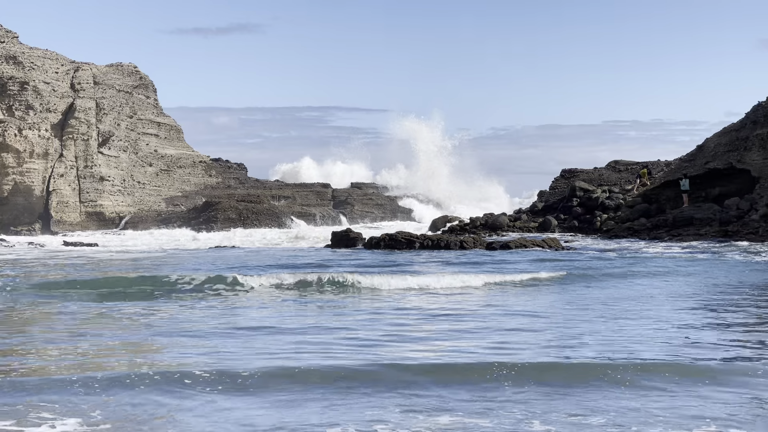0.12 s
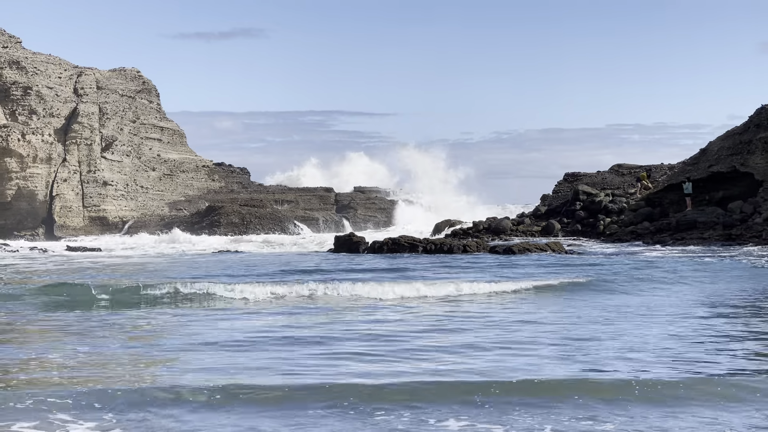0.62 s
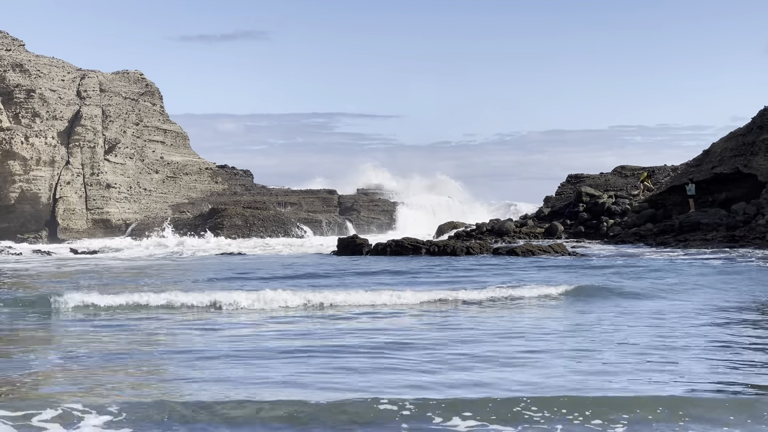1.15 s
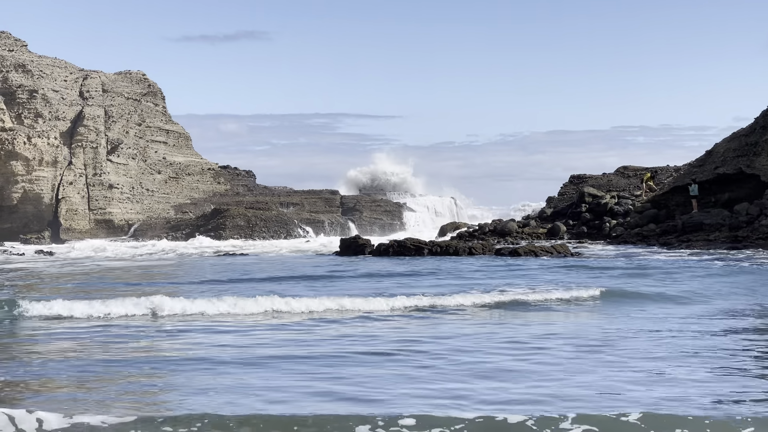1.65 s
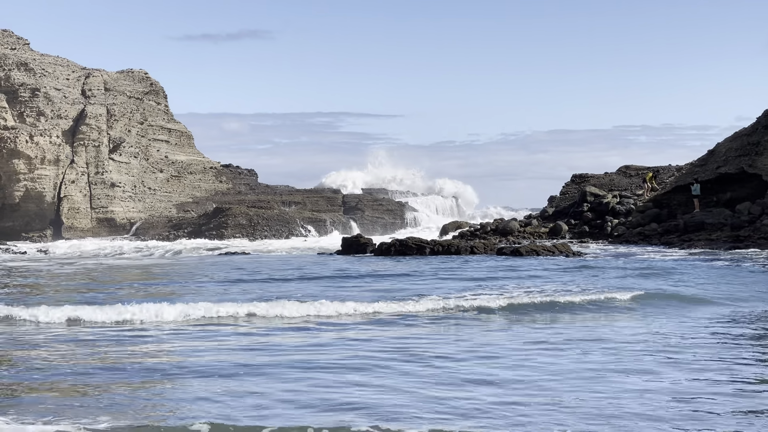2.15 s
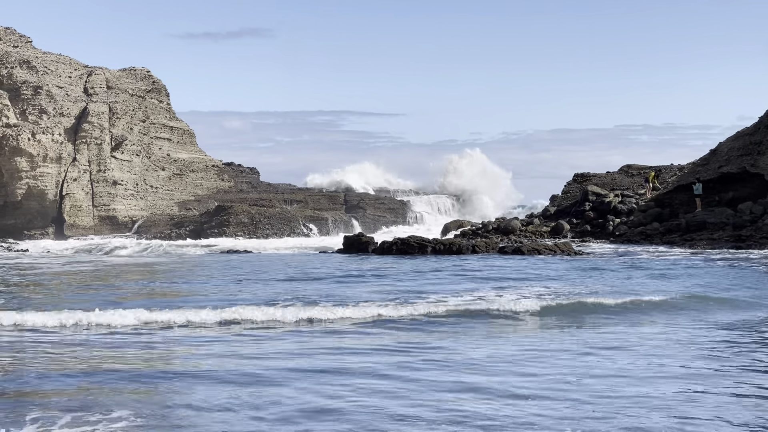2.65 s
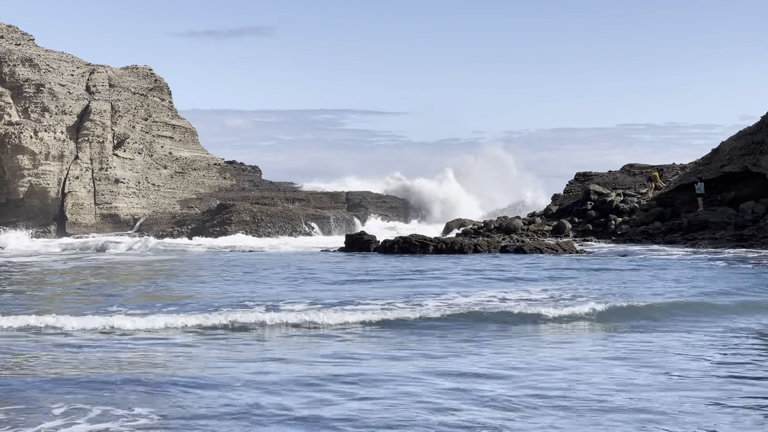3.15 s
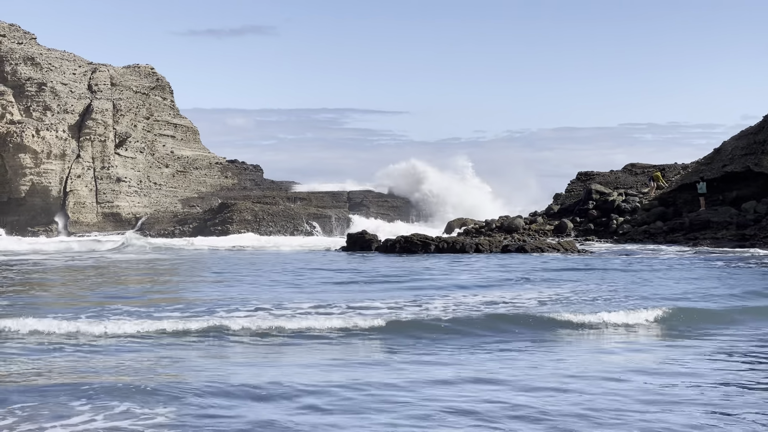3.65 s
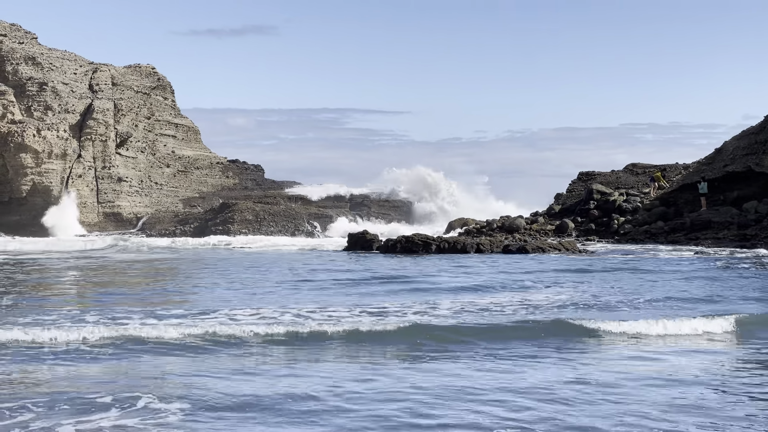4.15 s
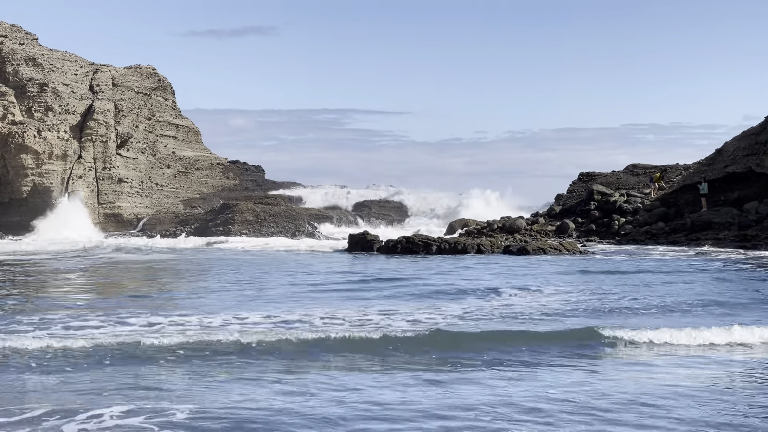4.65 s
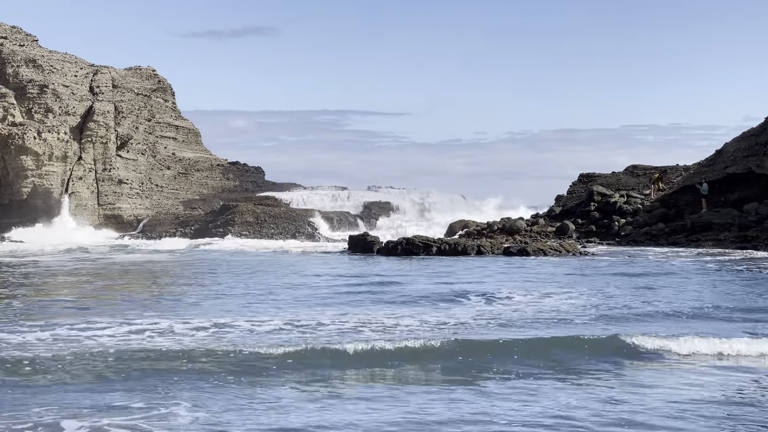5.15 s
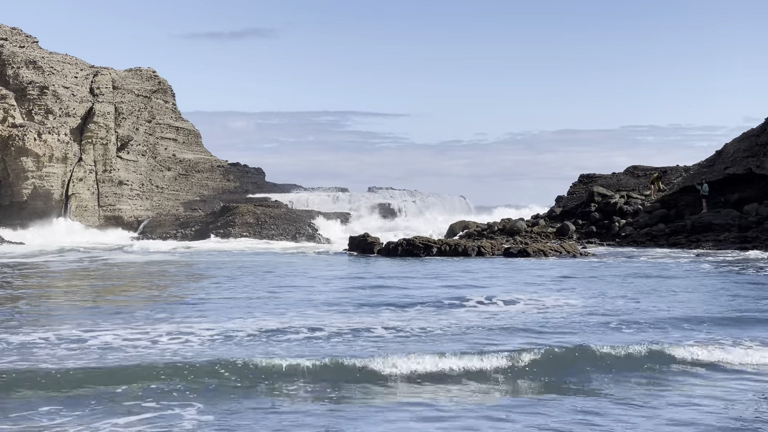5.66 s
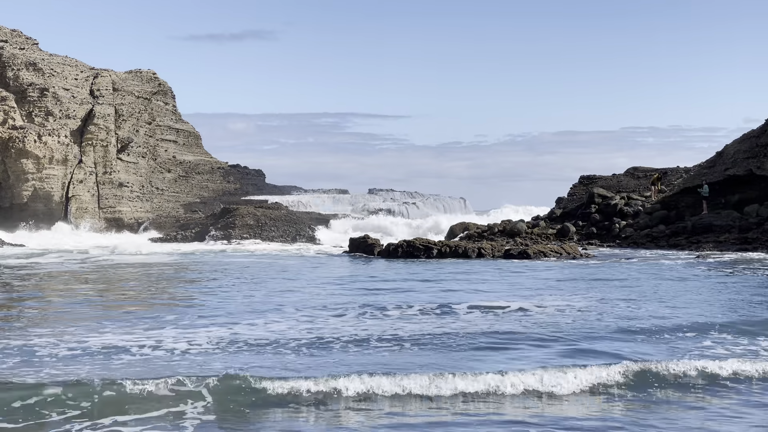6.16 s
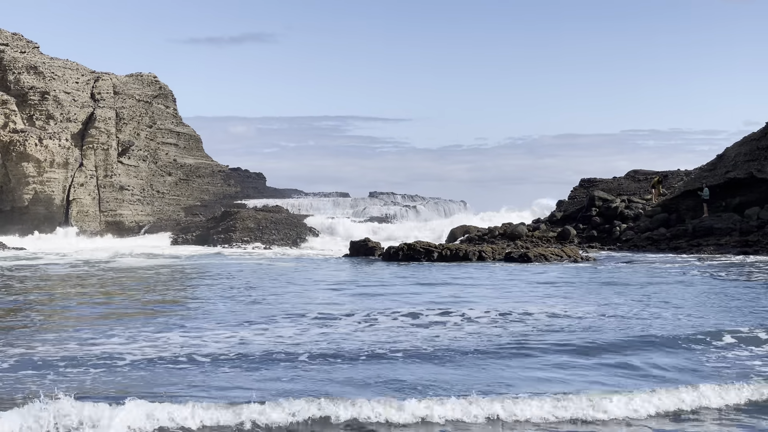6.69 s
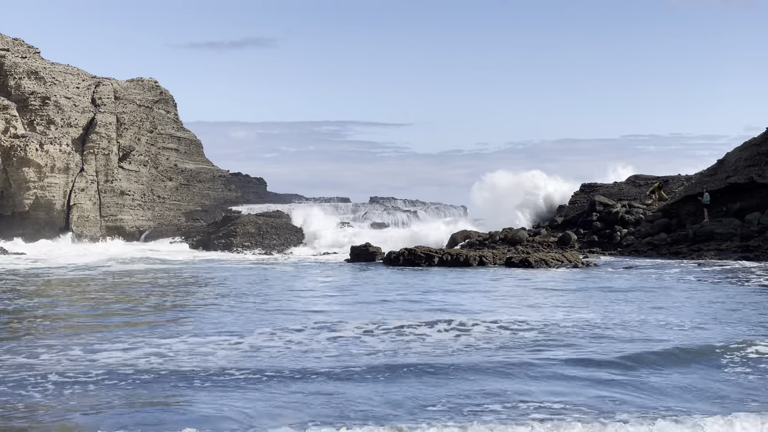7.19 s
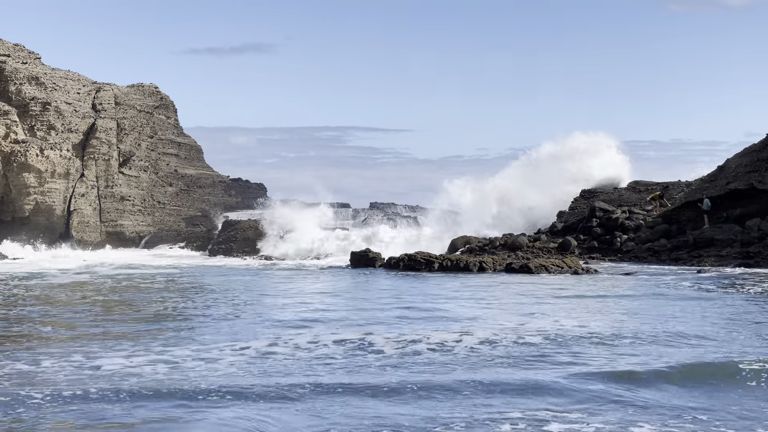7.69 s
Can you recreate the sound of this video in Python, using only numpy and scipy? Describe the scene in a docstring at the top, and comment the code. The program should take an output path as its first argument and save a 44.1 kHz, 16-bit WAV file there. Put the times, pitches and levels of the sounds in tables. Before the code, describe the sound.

Surf in an open rocky cove, heard in stereo from the shore, continuous from start to finish. Distant breakers give a dull, broad roar with gurgling bubbles and an uneven low boom; a breeze presses on the microphone as soft deep buffeting. At first the near foam is only a quiet wash and fizz, lifting slightly around 1 s. From about 1.8 to 3.2 s small wavelets fold, with tiny sharp spray spits, a few hollow rising plops near 2 to 2.5 s and fuller hiss by 3 s. Soft low thumps come at 2.5, 3.4, 4 and 4.3 s, with a gust near 3.4 s. The surf then runs steadier. Spray returns at 5.5 to 5.8 s, building to the loudest rush and bright fizz near 6.6 s, with a tumbling cluster of plops until 7 s. Low thumps follow at 7 to 7.2 s amid swelling boom; foam keeps hissing to the end at 7.8 s.

```python
"""Surf in a rocky cove, in a breeze. Throughout, far breakers boom in lumps and roar as merged bubble noise,
near foam fizzes as its bubbles burst, and wind presses on a microphone pair as deep filtered noise.
Wavelets fold at about 1, 2 and 3 s: spray jumps in level, closing air pockets plop as short rising tones,
and low thumps follow until 4.3 s. From 5.5 s the spray returns; the roar and foam peak near 6.6 s
in a cluster of plops, then low thumps sound near 7 s while the boom swells."""
import sys
import numpy as np
from scipy import signal
from scipy.fft import rfft, irfft, next_fast_len
from scipy.io import wavfile
from scipy.ndimage import uniform_filter1d, map_coordinates

SR = 44100
rng = np.random.default_rng(int(sys.argv[2]) if len(sys.argv) > 2 else 0)


def store_pcm(level_fs):
    """Save levels as 16-bit WAV."""
    pcm = np.round(np.clip(level_fs, -1, 1) * 32767).astype(np.int16)
    wavfile.write(sys.argv[1], SR, np.atleast_2d(pcm).T)


def gain_from_decibels(decibels):
    """Convert decibel values to linear amplitude factors."""
    exponent = np.asarray(decibels, float) / 20
    return 10 ** exponent


N = 344421  # samples, 7.81 s


def unit(x):
    """Normalization: scale to an rms of 1 over all rows."""
    return x / np.sqrt(np.mean(x ** 2) + 1e-20)


def along(points, hz):
    """Piecewise-linear interpolation of (f/Hz, value) points on a logarithmic frequency axis."""
    f, value = np.transpose(points)
    return np.interp(np.log(hz + 1), np.log(f + 1), value)


def curve(points):
    """Piecewise-linear envelope: (t/s, value) points interpolated at every sample."""
    t, value = np.transpose(points)
    return np.interp(np.arange(N) / SR, t, value)


def wobble(rate):
    """Slow random modulation: a smooth curve through rate random knots a second."""
    knots = rng.standard_normal(int(N * rate / SR) + 4)
    return map_coordinates(knots, [np.arange(N) * rate / SR])


def filtered(x, response):
    """Linear filtering: the spectrum of x times a complex response of frequency."""
    size = next_fast_len(N + 8192)
    hz = np.fft.rfftfreq(size, 1 / SR)
    return irfft(rfft(x, size) * response(hz), size)[..., :N]


def patchy(depth_db):
    """Non-stationary noise: two white noises share random level patches in time and frequency."""
    cells = signal.stft(rng.standard_normal((2, N)), nperseg=512)[2]
    field = rng.standard_normal(cells.shape[1:])
    field = uniform_filter1d(field, size=8, axis=0)  # over frequency
    field = uniform_filter1d(field, size=12, axis=1)  # over time
    return signal.istft(cells * gain_from_decibels(depth_db * unit(field)), nperseg=512)[1][:, :N]


def crackle(count, spread_db):
    """Shot noise: two streams of bubble impulses at random instants, a few much larger than most."""
    streams = []
    for draw in rng.random((2, count, 3)):
        instant = (draw[:, 0] * N).astype(int)
        size = gain_from_decibels(-spread_db * np.log(1 - .997 * draw[:, 1]))
        sign = np.sign(draw[:, 2] - .5)
        streams.append(np.bincount(instant, size * sign, N))
    return unit(np.array(streams))


def coloured(pair, spectrum):
    """Spectral shaping: a noise pair filtered to a spectrum, at rms sqrt(2), which scene() divides out."""
    return unit(filtered(pair, lambda hz: gain_from_decibels(along(spectrum, hz)))) * np.sqrt(2)


def bursts(table, rise):
    """Oscillation of trapped air: a soft start and a few cycles, the pitch rising by the fraction
    rise either side of its mean."""
    out = np.zeros(N + SR)
    for s, db, hz, cycles in table:
        length = SR * cycles / hz
        u = np.arange(int(length)) / length
        swing = np.sin(2 * np.pi * cycles * (u + rise * (u * u - u)))
        envelope = np.sin(np.pi * u ** 0.67) ** 2
        out[round(s * SR):][:len(u)] += gain_from_decibels(db) * envelope * swing
    return out[:N]


def wind():
    """Pressure fluctuation: gusts press on the microphones far down in the bass."""
    # deep buffeting: t/s, level/dB
    gusts = [(0, -32), (.17, -43), (.37, -34), (.55, -47), (.9, -35.5), (1.5, -39), (1.78, -50),
             (2.25, -35.5), (3.3, -36.5), (3.45, -27), (3.85, -39), (4.0, -37), (4.55, -39.5), (5.3, -35),
             (5.5, -42), (7.0, -36), (7.24, -34), (7.4, -39), (7.75, -29)]
    # spectrum of the buffeting: f/Hz, relative spectral level/dB
    buffet = [(20, -30), (32, 3), (45, 4.5), (62, 12.5), (85, 5.5), (130, -35)]
    return gain_from_decibels(curve(gusts) + 0.36 * wobble(4.9)) * coloured(patchy(depth_db=0.5), buffet)


def rumble():
    """Amplitude modulation of low noise: the boom of far breakers arrives in lumps."""
    # the boom swells and sinks: t/s, level/dB
    boom = [(0, -31.5), (2.3, -33.5), (2.55, -31), (3.15, -31.5), (3.45, -29.5), (3.7, -33), (4.0, -28.5),
            (4.5, -30), (5.3, -27), (5.6, -28.5), (5.75, -32.5), (5.95, -29.5), (6.5, -31.5), (7.1, -27),
            (7.4, -29.5), (7.81, -28.5)]
    # spectrum of the boom: f/Hz, relative spectral level/dB
    spectrum = [(35, -36), (60, -0.5), (90, 1), (125, 1), (250, -7.5), (400, -14.5), (700, -30),
                (1200, -61)]
    lumps = gain_from_decibels(0.6 * wobble(7.9) + 0.82 * wobble(25))
    return gain_from_decibels(curve(boom)) * lumps * coloured(patchy(depth_db=0.65), spectrum)


def gurgle(count, centre_hz):
    """Bubble resonance: large bubbles ring at random moments, pitches and levels in tumbling water."""
    draw = rng.random((count, 3))
    octaves = 1.128 * (draw[:, 1] + draw[:, 2] - 1) * 2  # triangular spread about the centre
    db = rng.normal(0, 2.4, count)
    cycles = np.full(count, 6.5)
    table = np.transpose([draw[:, 0] * N / SR, db, centre_hz * 2 ** octaves, cycles])
    return unit(bursts(table, rise=0.22))


def roar():
    """Incoherent superposition: countless far bubbles merge into a rush; larger ones gurgle through."""
    # how much the far surf tumbles: t/s, level/dB
    surf = [(0, -35.5), (.7, -36), (.9, -32.5), (1.1, -34.5), (1.26, -33.5), (1.6, -35.5), (2.15, -34),
            (2.45, -33.5), (2.75, -32.5), (3.05, -30.5), (3.3, -30), (3.7, -32), (4.5, -33), (5.0, -33),
            (6.2, -32.5), (6.5, -30.5), (6.66, -28.5), (7.05, -30), (7.45, -33), (7.81, -33.5)]
    # spectrum of the rush: f/Hz, relative spectral level/dB
    spectrum = [(120, -6.5), (250, 1), (450, -2.5), (750, -0.5), (900, -4.5), (1300, -8), (2000, -18),
                (3500, -37)]
    rush = coloured(patchy(depth_db=0.9), spectrum)
    rush[0] += .35 * gurgle(count=900, centre_hz=523)
    return gain_from_decibels(curve(surf) + 0.31 * wobble(8.6)) * rush


def thumps():
    """Low-frequency transients: thumps of water or wind, a few cycles of slightly rising pitch."""
    # t/s, level/dB (peak), f/Hz, length/cycles
    knocks = [(2.469, -21, 98, 2.4), (2.648, -16.5, 85, 1.2), (3.406, -18, 144, 4.1), (3.47, -14, 86, 2.4),
              (3.949, -14.5, 75, 4), (4.288, -18, 113, 2.1), (6.678, -22.5, 95, 1.5), (7.05, -18, 90, 1.06),
              (7.08, -21, 90, 1.5), (7.219, -18.5, 60, 3.3)]
    return bursts(knocks, rise=0.065)


def plops():
    """Cavity resonance: air pockets close as a wavelet folds, the pitch rising as each shrinks."""
    # t/s, level/dB (peak), f/Hz, length/cycles
    pockets = [(2.027, -28, 770, 12), (2.334, -26.5, 710, 13), (2.485, -19.5, 746, 6.6),
               (3.352, -29, 730, 5.1), (4.075, -24, 615, 7.1), (6.605, -22, 600, 5.6),
               (6.635, -14.5, 750, 7.5), (6.657, -20, 660, 6), (6.74, -21, 380, 4.7),
               (6.743, -19, 193, 3.2), (6.803, -22.5, 318, 6.4), (6.821, -18.5, 580, 4.5),
               (6.872, -22, 296, 5.5), (6.991, -20, 264, 5.3)]
    return bursts(pockets, rise=0.14)


def spits():
    """Exponential decay: spray landing close by lifts the level (dB), which falls back within moments."""
    # t/s, jump/dB (before the onset ramp and each foam layer's weight), decay time/s
    spray = [(1.04, 1, 0.027), (1.856, 8, .005), (2.035, 11, 0.0064), (2.467, 5, .02), (2.777, 7, .012),
             (2.852, 9.5, .012), (2.958, 9, 0.01), (2.990, 5, .012), (3.16, 5, .025), (5.49, 2, .02),
             (5.739, 4, .015), (5.773, 5, .015), (6.160, 1, .01), (6.441, 5, .01), (6.509, 4.5, .02),
             (6.538, 8, .02), (6.588, 9.5, 0.011), (6.628, 8, 0.019)]
    out = np.zeros(N + SR)
    t = np.arange(SR // 4) / SR
    for s, db, tau in spray:
        onset = np.minimum(t / 0.0017, 1)
        out[round(s * SR):][:len(t)] += db * onset * np.exp(-t / tau)
    return out[:N]


def freshness():
    """Bubble ageing: the finest bubbles' lift (dB) grows as a wavelet folds and fades as foam coarsens."""
    # wavelets folding over: t/s, lift/dB of the sizzle (before growth and fading)
    folds = [(1.0, 2), (1.8, 2), (2.75, 3.5), (5.7, 1.5), (6.45, 1.5), (6.95, 2.5)]
    rise_s, coarsen_s = .1, 0.66
    start, lift_db = np.transpose(folds)[..., None]
    age = np.maximum(np.arange(N) / SR - start, 0)
    growth = 1 - np.exp(-age / rise_s)
    return np.sum(lift_db * growth * np.exp(-age / coarsen_s), axis=0)


def fizz():
    """Shot noise over filtered noise: near foam as wash, hiss and fine sizzle, in quick flurries."""
    # how much near foam is bursting: t/s, level/dB of the hiss
    foam = [(0, -46), (1.5, -45), (2.3, -46.5), (2.5, -44.5), (2.65, -46.5), (2.95, -41.5), (3.5, -42),
            (3.9, -42), (4.3, -43), (5.3, -44.5), (5.47, -42), (5.62, -44), (5.79, -41), (5.95, -43.5),
            (6.35, -41.5), (6.58, -37), (6.8, -40), (7.05, -39.5), (7.81, -42.5)]
    # the broad wash: t/s, level/dB
    washing = [(0, -41), (.7, -42), (.9, -42.5), (1.08, -42), (1.25, -40.5), (1.7, -42), (2.45, -40.5),
               (2.72, -41), (3.0, -37), (3.6, -38), (4.0, -35.5), (4.6, -38.5), (5.6, -39), (5.8, -37.5),
               (6.1, -38.5), (6.5, -36), (6.85, -37), (7.05, -37.5), (7.81, -37.5)]
    # spectra of the three layers: f/Hz, relative spectral level/dB
    wash_spectrum = [(600, -13), (1100, 1.5), (1600, 0), (2400, -0.5), (3300, -4.5), (4500, -15),
                     (7000, -36)]
    hiss_spectrum = [(1500, -34), (2800, -3.5), (3800, -1), (5000, -4), (6500, -5), (9000, -8.5),
                     (13000, -26), (16000, -49)]
    sizzle_spectrum = [(4000, -30), (6500, -21), (9000, -0.5), (11500, -1.5), (12700, 1), (14000, -5),
                       (14900, -7), (16500, -17)]

    hiss_db = curve(foam)
    wash_db = curve(washing)
    # -51.5 dB when the hiss is at -44 dB, then 0.97 dB per dB
    sizzle_db = -51.5 + 0.97 * (hiss_db + 44) + freshness()
    flurry = 0.12 * wobble(14) + 0.65 * wobble(40) + spits()

    wash = coloured(patchy(depth_db=0.84), wash_spectrum)
    hiss_grains = 0.39 * crackle(count=60000, spread_db=3.0)
    hiss = coloured(patchy(depth_db=0.46) + hiss_grains, hiss_spectrum)
    sizzle_grains = 0.91 * crackle(count=25000, spread_db=3.0)
    sizzle = coloured(patchy(depth_db=1.0) + sizzle_grains, sizzle_spectrum)

    # the finer the sound, the more it follows the flurries
    out = gain_from_decibels(wash_db + 0.52 * flurry) * wash
    out += gain_from_decibels(hiss_db + 0.67 * flurry) * hiss
    out += gain_from_decibels(sizzle_db + 1.02 * flurry) * sizzle
    return out


def ports(pair):
    """Partial coherence: row 0 is shared by both ports, row 1 differs in sign between them;
    the recorder's body shifts phase and balance."""
    # likeness of left and right: f/Hz, correlation (0-1)
    alike = [(60, .96), (300, .97), (500, .83), (900, .7), (1500, .86), (2100, .985), (3200, .97),
             (5000, .93), (7900, .9), (8500, .98), (9100, .97), (10000, .87), (12900, .87), (13300, .995)]
    # phase by which left leads: f/Hz, phase/rad
    lead = [(20, 0), (800, .5), (1700, -.05), (2250, .05), (3100, .64), (4300, .54), (5250, .6),
            (5770, -1.63), (6700, -.8), (7150, -1.15), (7540, -2.32), (7900, -2.2), (8700, -3.14),
            (10500, -4.35), (12000, -5.27), (13300, -6.28)]
    # left over right: f/Hz, level/dB
    tilt = [(200, 0), (500, 1.2), (850, 2.5), (1500, 1.3), (2200, 0)]

    def split(hz):
        angle = np.arccos(np.clip(along(alike, hz), 0, 1)) / 2
        return np.array([np.cos(angle), np.sin(angle)])

    def skew(hz):
        left = gain_from_decibels(along(tilt, hz) / 2) * np.exp(.5j * along(lead, hz))
        return np.array([left, 1 / left])

    shared, apart = filtered(pair, split)
    return filtered(np.array([shared + apart, shared - apart]), skew)


def scene():
    """Superposition: water and wind add at the microphone pair; single knocks enter the shared row only."""
    water = (wind() + rumble() + roar() + fizz()) / np.sqrt(2)
    knocks = thumps() + plops()
    return ports(water + knocks * [[1], [0]])


def band_limit(x):
    """A steep low-pass at the top of the band."""
    return signal.sosfilt(signal.butter(12, 15670, fs=SR, output="sos"), x)


def record(dry):
    """Band limiting: a gentle low cut; the top is dulled above 14.6 kHz and cut off at 15.7 kHz."""
    def response(hz):
        # f/Hz, level/dB
        edges = [(25, -5), (40, 0), (14600, 0), (15300, -8)]
        return gain_from_decibels(along(edges, hz)) * (hz < 15700)

    return band_limit(filtered(dry, response))


dry = scene()
out = record(dry)
store_pcm(out)
```